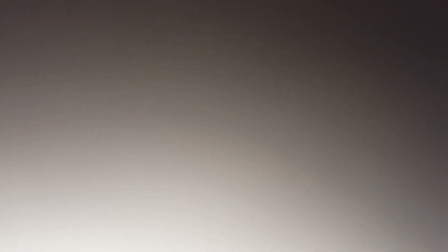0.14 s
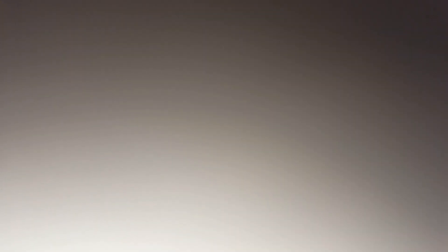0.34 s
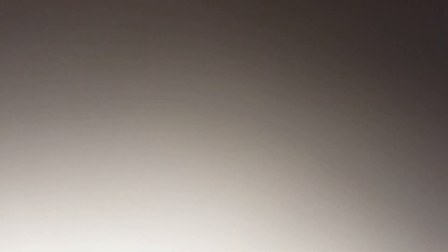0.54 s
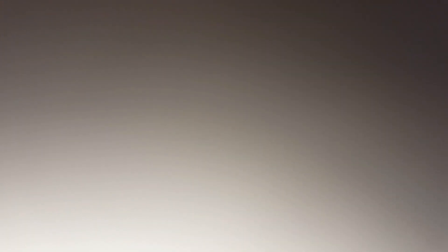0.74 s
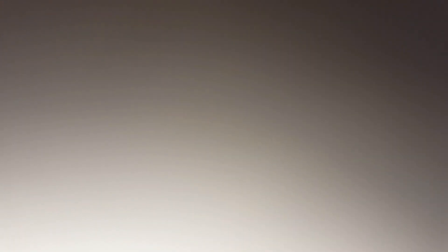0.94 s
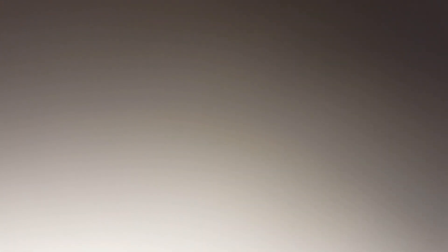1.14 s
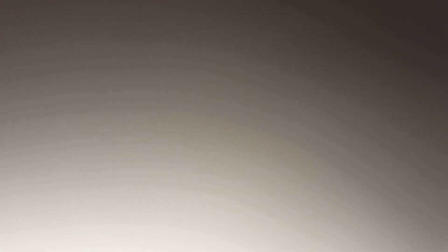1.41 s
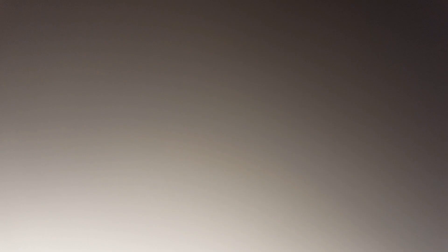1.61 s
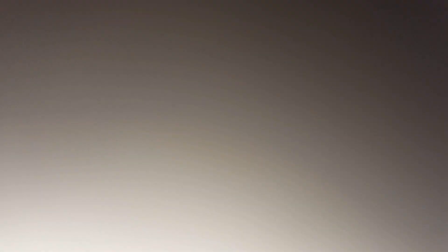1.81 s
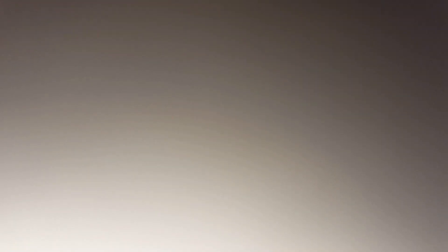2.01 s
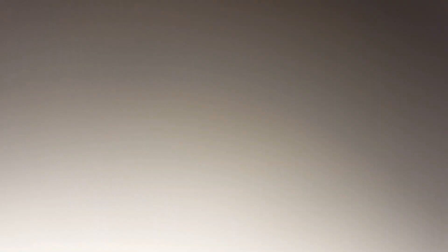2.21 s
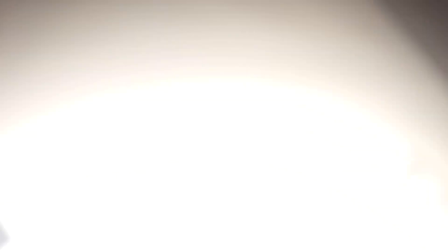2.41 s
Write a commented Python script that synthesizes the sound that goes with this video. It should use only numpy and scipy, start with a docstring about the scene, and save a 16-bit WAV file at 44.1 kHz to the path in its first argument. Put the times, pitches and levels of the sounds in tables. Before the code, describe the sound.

Compressed air hisses from a tank valve in a small room, very close and mostly left, bright with metallic ringing near 4 kHz and sputtering wind on the microphone. At 0.54 s a short, rough hollow surge lasts until 0.7 s. The hiss weakens from 1 s, swelling briefly at 1.4 s, with finger rubs and bumps. It stops around 2.2 s with a faint whistle; fumbling knocks follow, then a switch clicks at 2.49 s.

```python
"""Air hisses and roars out of a tank valve in a small room: filtered noise, with metal resonances ringing.
Fingers bump by the left microphone port (decaying sines) as the jet sputters and blows on the microphone.
At 0.54 s the valve opens wider: a short, hollow surge. The hiss then weakens while fingers rub (noise
through a gap resonance), and a faint whistle ends it at 2.2 s. A switch clicks at 2.49 s."""
import sys
import numpy as np
from scipy import signal
from scipy.fft import rfft, irfft
from scipy.io import wavfile
from scipy.ndimage import map_coordinates

SR = 44100
rng = np.random.default_rng(int(sys.argv[2]) if len(sys.argv) > 2 else 0)


def master(y):
    """Save y as 16-bit WAV."""
    cut = np.clip(np.atleast_2d(y).T, -1, 1)
    pcm = np.round(cut * 32767)  # scale
    wavfile.write(sys.argv[1], SR, pcm.astype(np.int16))


N = 112454
TIME = np.arange(N) / SR
BIN_HZ = np.fft.rfftfreq(N, 1 / SR)


def from_db(db):
    """Decibels to amplitude gain."""
    return 10 ** (np.asarray(db) / 20)


def rms_one(x):
    """Scale each channel to rms 1."""
    return x / np.sqrt(np.mean(x ** 2, axis=-1, keepdims=True) + 1e-20)


def in_time(rows):
    """Join the rows of a curve, time first, by straight lines; one signal per further column."""
    seconds, *columns = np.transpose(rows)
    return [np.interp(TIME, seconds, column) for column in columns]


def leftward(pan_db):
    """Channel gains: the right is weaker by pan_db."""
    pan_db = np.atleast_1d(pan_db)
    return from_db(np.array([0 * pan_db, -pan_db]))


def coloured(points, shared_power=0):
    """Stereo noise of rms 1 with one spectrum for both sides, or one for each."""
    hz, *columns = np.transpose(points)
    log_hz = np.log(np.maximum(BIN_HZ, 1))
    gain = from_db([np.interp(log_hz, np.log(hz), column) for column in columns])
    white = rng.standard_normal((3, N))
    share = np.clip(shared_power, 0, 1)
    stereo = np.sqrt(1 - share) * white[:2] + np.sqrt(share) * white[2]
    return rms_one(irfft(rfft(stereo) * gain, N))


def flicker(corner_hz, depth_db):
    """A randomly wavering gain of rms 1: twice low-passed noise, taken as decibels."""
    r = np.exp(-2 * np.pi * corner_hz / SR)
    # the first second lets the filter settle
    slow = signal.lfilter([1], [1, -2 * r, r * r], rng.standard_normal(N + SR))[SR:]
    return rms_one(from_db(depth_db * rms_one(slow)))


def resonator(hz, width_hz):
    """Two-pole filter coefficients of a resonance with gain 1 on top."""
    r = np.exp(-np.pi * width_hz / SR)
    b = (1 - r * r) / 2 * np.array([1, 0, -1])
    a = [1, -2 * r * np.cos(2 * np.pi * hz / SR), r * r]
    return b, a


def decay(start_s, t60_s):
    """Silence, then an exponential fall from 1."""
    return (TIME >= start_s) * from_db(-60 * np.maximum(TIME - start_s, 0) / t60_s)


def with_walls(x, room_db, t60_s):
    """The direct sound plus a short noise-like scatter from nearby walls, at about unchanged power."""
    wall_delay_s = 0.0012
    walls = rms_one(rng.standard_normal((2, N)) * decay(wall_delay_s, t60_s)) / np.sqrt(N)
    wet = from_db(room_db)
    scatter = signal.fftconvolve(np.atleast_2d(x), walls, axes=1)[:, :N]
    return (x + wet * scatter) / np.sqrt(1 + wet ** 2)


def hiss():
    """Jet noise whose colour shifts as the pressure falls and whose top follows the opening."""
    # Each row: time in seconds, left level in dB, left minus right in dB, power share of the top (0-1).
    flow = [(.26, -19, 5, .59), (.46, -16, 5, 0.64), (.57, -16.5, 2, 0.62), (.63, -19, 3.5, 0.42),
            (.76, -18.5, 5, 0.63), (.9, -18, 5.5, 0.56), (1.06, -24, 7.5, 0.57), (1.29, -25, 7.5, 0.52),
            (1.39, -22, 5, 0.49), (1.68, -29.5, 6.5, 0.73), (1.95, -30, 4.5, 0.63), (1.99, -27.5, 5, 0.68),
            (2.02, -39.5, 4.5, 0.58), (2.08, -34.5, 9, 0.48), (2.11, -48, 4, 0.6), (2.135, -38.5, 7, 0.53),
            (2.22, -45, 4, 0.36), (2.245, -50.5, 9, 0.46), (2.33, -50.5, 2, .65), (2.41, -45, 14, 0.3),
            (2.55, -50, 6, 0.36)]
    # Jet spectra at high and at low tank pressure. Each row: frequency in Hz, left dB, right dB.
    strong_colour = [(1520, -25, -13), (2720, -20.5, -6.5), (3360, -26.5, -8), (4220, -16, -5.5),
                     (5100, -11.5, -4.5), (6330, -15.5, -2), (6640, -6, 0), (7440, -6, 2.5),
                     (9150, -2.5, 1.5), (10340, -9, -18), (11400, -5.5, 5.5), (12460, 1.5, -3),
                     (14670, 2, 2.5), (16500, -29, -3.5)]
    weak_colour = [(1430, -19.5, -18), (2650, -8, -2), (2980, -13.5, -4), (3800, -4, -3),
                   (5000, -10.5, -6.5), (5960, -15, 1.5), (6520, -7.5, -17), (7820, -0.5, 7.5),
                   (9300, -4.5, -5), (10160, -11, -3), (11500, -3, -6), (12450, 4.5, 4.5),
                   (14100, 3.5, 1.5), (15400, -1.5, -27)]
    pressure_fall_s = (1.18, 1.56)
    top_above_hz, flutter_hz, flutter_db = 11050, 28, 0.62

    level_db, pan_db, bright = in_time(flow)
    bright = np.clip(bright, 0, 1)
    spent = np.interp(TIME, pressure_fall_s, [0, 1])
    air = np.sqrt(1 - spent) * coloured(strong_colour) + np.sqrt(spent) * coloured(weak_colour)
    top = irfft(rfft(air) * (BIN_HZ > top_above_hz), N)
    air = np.sqrt(bright) * rms_one(top) + np.sqrt(1 - bright) * rms_one(air - top)
    return air * from_db(level_db) * leftward(pan_db) * flicker(flutter_hz, flutter_db)


def seat_whistle():
    """The last air through the closing seat: a narrow band of hiss that stops when the valve seats."""
    start_s, end_s, edge_s = 2.121, 2.234, 0.003
    level_db, pan_db = -41, 17
    gate = np.clip(np.minimum(TIME - start_s, end_s - TIME) / edge_s, 0, 1)
    seat = resonator(hz=8960, width_hz=1000)
    band = signal.lfilter(*seat, rng.standard_normal((2, N)))
    band = signal.lfilter(*seat, band)   # second pass steepens the skirts
    return rms_one(band) * gate * from_db(level_db) * leftward(pan_db)


def surge():
    """The valve opens wider: a rougher burst that rises to pitch, holds, thins and shuts off."""
    # Burst spectrum. Each row: frequency in Hz, left dB, right dB.
    burst_colour = [(2250, -49, -45), (2700, -17.5, 1), (3520, -10, 8), (3880, -6, 7), (4300, 3.5, -9),
                    (4670, -6, 8), (5000, -11, -5.5), (6400, -21, 0), (7560, -7.5, -20), (8300, -11, -8),
                    (10500, -30, -22)]
    start_s, attack_s, hold_s = .541, 0.0038, 0.044
    end_s, release_s = 0.704, 0.0071   # release is a time constant
    level_db, pan_db = -12.5, 9
    step_after_hold_db, sag_db_per_s = 0.5, 61
    start_flat, settle_s = .06, .03   # flat by this share of the pitch, settling with this time constant
    wander_hz, wander_db = 25.4, 0.16
    low_below_hz, low_fade_db_per_s = 4200, 51
    rough_hz, rough_db = 84, 1.2

    age = np.maximum(TIME - start_s, 0)
    after_hold = np.maximum(age - hold_s, 0)
    gate = np.clip(age / attack_s, 0, 1) * np.exp(-np.maximum(TIME - end_s, 0) / release_s)
    envelope_db = level_db + step_after_hold_db * (age > hold_s) - sag_db_per_s * after_hold

    # reading the noise at a varying speed bends its pitch
    speed = flicker(wander_hz, wander_db) - start_flat * np.exp(-age / settle_s)
    place = np.cumsum(speed)
    jet = np.array([map_coordinates(side, [place], order=3) for side in coloured(burst_colour)])

    # the low side fades first as the valve closes again
    low = irfft(rfft(jet) * (BIN_HZ < low_below_hz), N)
    jet = jet - low + low * from_db(-low_fade_db_per_s * after_hold)
    return jet * gate * from_db(envelope_db) * flicker(rough_hz, rough_db) * leftward(pan_db)


def tank_ring():
    """The escaping air, as noise, keeps a cluster of metal resonances of valve and tank ringing."""
    # Each row: time in seconds, level in dB.
    ring_level = [(0, -25.5), (.06, -54), (.15, -31.5), (.45, -27), (.62, -27.5), (.8, -29.5),
                  (1.02, -35.5), (1.28, -37.5), (1.37, -31), (1.52, -33.5), (1.72, -42.5), (1.97, -37.5),
                  (2.12, -54.5), (2.55, -62)]
    # Each row: frequency in Hz, width in Hz, relative level in dB.
    ring_modes = [(4260, 280, 10), (3990, 75, 11), (4270, 33, 5), (3960, 74, -21), (4480, 40, -5),
                  (4720, 25, 0)]
    pan_db = 13
    drive = coloured([(2500, -10), (3800, 2.0), (4900, 2.5), (7000, -29)])   # (Hz, dB)
    ring = 0
    for hz, width_hz, mode_db in ring_modes:
        mode = signal.lfilter(*resonator(hz, width_hz), drive)
        ring = ring + from_db(mode_db) * rms_one(mode)
    return rms_one(ring) * from_db(in_time(ring_level)[0]) * leftward(pan_db)


def turbulence():
    """The jet's sputtering roar, and the low rumble of draught and handling on the microphone ports."""
    # Levels of roar and draught. Each row: time in seconds, level in dB.
    roar_level = [(0, -41), (.11, -39.5), (.21, -39), (.29, -48), (.33, -33), (.42, -40), (.53, -32),
                  (.58, -35), (.73, -39.5), (.83, -35), (1.05, -45), (1.28, -51.5), (1.36, -41),
                  (1.52, -49.5), (1.66, -48), (1.82, -51.5), (1.98, -44), (2.04, -63), (2.3, -56),
                  (2.41, -68)]
    draught_level = [(0, -47.5), (.29, -57), (.38, -47), (.53, -42), (.58, -45.5), (.81, -48), (1.05, -52),
                     (1.85, -65), (1.97, -57), (2.03, -73), (2.24, -59), (2.315, -46), (2.39, -74)]
    # Spectra of roar and draught. Each row: frequency in Hz, level in dB.
    roar_colour = [(100, -11), (220, -7), (380, 1.5), (600, -1), (1300, 5.5), (2000, -1.5), (2600, -13),
                   (4000, -22)]
    draught_colour = [(25, -41), (70, 3), (130, 2.5), (200, -0.5), (400, -17), (1000, -47)]
    sputter_hz, sputter_db = 13.6, 3
    roar_pan_db, draught_pan_db = 2, 5

    roar = coloured(roar_colour, shared_power=0.47) * flicker(sputter_hz, sputter_db)
    roar = roar * from_db(in_time(roar_level)[0]) * leftward(roar_pan_db)
    draught = coloured(draught_colour) * from_db(in_time(draught_level)[0])
    return roar + draught * leftward(draught_pan_db)


def finger_rub():
    """Grainy friction, heard directly and through the shifting resonance of the gap at the port."""
    # Each row: time in seconds, level in dB, resonance of the gap under the fingers in Hz.
    rub = [(1.28, -53, 2300), (1.34, -37.5, 1590), (1.41, -30, 1260), (1.455, -30, 1270), (1.48, -37, 1240),
           (1.55, -43, 1190), (1.64, -69, 1310), (1.79, -54, 1270), (1.85, -37, 1270), (2.0, -41, 1320),
           (2.12, -46.5, 1320), (2.3, -49.5, 1330), (2.37, -39, 1500), (2.405, -48, 1610),
           (2.42, -49.5, 1540), (2.55, -58, 1490)]
    # Friction spectrum. Each row: frequency in Hz, level in dB.
    scrape_colour = [(60, -33), (400, -7.5), (2200, 1), (2900, -16), (6000, -12)]
    gap_width_hz, pan_db = 176, 25
    grain_hz, grain_db = 99, 3
    scrape_db = -8   # direct friction relative to the resonance
    scrape_end_s = 2.378   # fingers lift: only the airy resonance is left

    level_db, gap_hz = in_time(rub)
    friction = coloured(scrape_colour) * flicker(grain_hz, grain_db)
    hollow, state = np.zeros((2, N)), np.zeros((2, 2))
    block = 128   # samples per retuning of the gap
    for i in range(0, N, block):
        b, a = resonator(gap_hz[i], gap_width_hz)
        hollow[:, i:i + block], state = signal.lfilter(b, a, friction[:, i:i + block], zi=state)
    scrape = from_db(scrape_db) * friction * (TIME < scrape_end_s)
    return rms_one(rms_one(hollow) + scrape) * from_db(level_db) * leftward(pan_db)


def finger_bumps():
    """Each catch rings the casing's thud, knock and tick, detuned at random, with a brief noise crack."""
    # Each row: time in seconds, thud dB, knock dB, tick dB (before the low cut), left minus right in dB.
    bumps = [(.002, -21, -29, -55, 30), (.1, -49, -36, -17.5, 6), (0.34, -48, -27, -16.5, 19),
             (1.455, -47, -43, -16, 22), (1.461, -30, -40, -14.5, 18), (1.597, -36, -29, -48, 26),
             (1.669, -35, -24, -41, 29), (1.875, -60, -26.5, -42, 25), (1.891, -58, -24, -44, 21),
             (1.948, -48, -35, -30, 3), (2.135, -60, -35.5, -32, 20), (2.233, -39, -54, -24.5, 18),
             (2.247, -42, -28.5, -30, 6.5), (2.287, -38, -28.5, -25.5, 14), (2.322, -31, -38, -29, 15),
             (2.332, -33, -32, -33, 17), (2.354, -53, -27, -49, 26), (2.36, -55, -42, -27.5, 28),
             (2.368, -39, -51, -25, 24)]
    # Casing modes: thud, knock, tick. Each row: nominal frequency in Hz, t60 in seconds.
    casing_modes = [(120, .05), (500, 0.0069), (1430, 0.0068)]
    detune_spread, low_cut_hz = .1, 98   # spread is the deviation of log frequency
    crack_band_hz, crack_db, crack_t60_s = (600, 3000), -7, 0.011   # dB relative to the tick

    band = signal.butter(2, crack_band_hz, "band", fs=SR, output="sos")
    crack = from_db(crack_db) * rms_one(signal.sosfilt(band, rng.standard_normal((2, N))))
    out = 0
    for start_s, thud_db, knock_db, tick_db, pan_db in bumps:
        hit = from_db(tick_db) * crack * decay(start_s, crack_t60_s)
        for mode_db, (hz, t60_s) in zip((thud_db, knock_db, tick_db), casing_modes):
            detuned_hz = hz * np.exp(detune_spread * rng.standard_normal())
            sine = np.sin(2 * np.pi * detuned_hz * (TIME - start_s))
            hit = hit + from_db(mode_db) * decay(start_s, t60_s) * sine
        out = out + hit * leftward(pan_db)
    return signal.sosfilt(signal.butter(2, low_cut_hz, "high", fs=SR, output="sos"), out)


def switch_click():
    """One snap into well-damped plastic modes: decaying sines of alternating sign, plus the walls."""
    # Each row: frequency in Hz, t60 in seconds, relative level in dB.
    click_modes = [(1420, 0.007, 2.5), (1830, 0.0057, 7.5), (2410, 0.003, 8), (3730, 0.0094, 0.5),
                   (6100, .005, -6), (8250, 0.0051, -3), (11100, .004, -7)]
    start_s, level_db, pan_db = 2.4852, -25, 10.5
    snap = 0
    for k, (hz, t60_s, mode_db) in enumerate(click_modes):
        sine = np.sin(2 * np.pi * hz * (TIME - start_s))
        snap = snap + (-1) ** k * from_db(mode_db) * decay(start_s, t60_s) * sine
    return from_db(level_db) * with_walls(snap, room_db=-7.5, t60_s=.07) * leftward(pan_db)


def room_floor():
    """Steady, mostly low background noise of the quiet room."""
    # Each row: frequency in Hz, level in dB.
    floor_colour = [(20, -21), (120, -3.5), (250, -7), (800, -10), (3000, -29), (15000, -32)]
    level_db = -61
    return from_db(level_db) * coloured(floor_colour)


def scene():
    """Air, handling and click over a quiet room."""
    air = with_walls(hiss() + seat_whistle(), room_db=-2.5, t60_s=0.056)
    air = air + surge() + tank_ring() + turbulence()
    return air + finger_rub() + finger_bumps() + switch_click() + room_floor()


def record(dry):
    """The highest peaks are rounded towards a ceiling, then a steep cut at the top."""
    ceiling, cutoff_hz = .9, 15800
    rounded = dry / (1 + (dry / ceiling) ** 6) ** (1 / 6)
    low_pass = signal.ellip(12, .05, 60, cutoff_hz, fs=SR, output="sos")
    return signal.sosfiltfilt(low_pass, rounded)


dry = scene()
out = record(dry)
master(out)
```